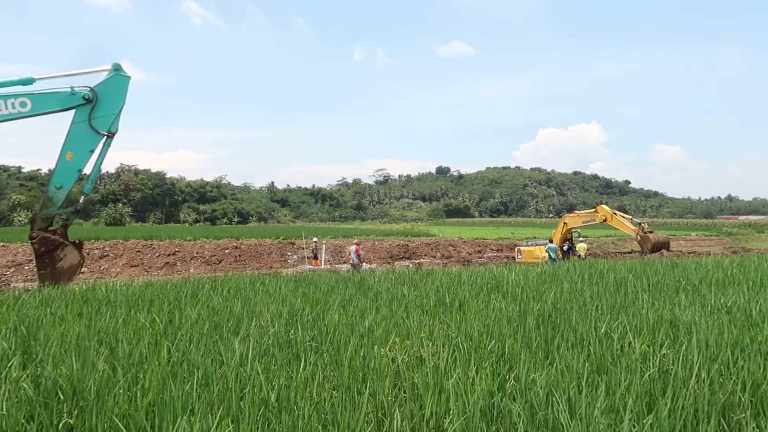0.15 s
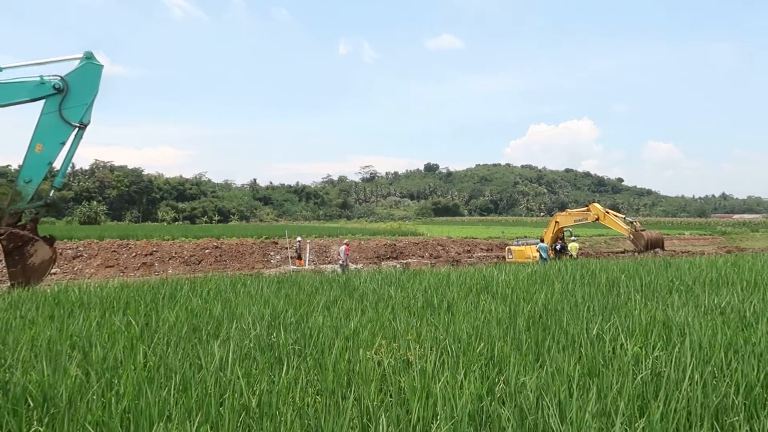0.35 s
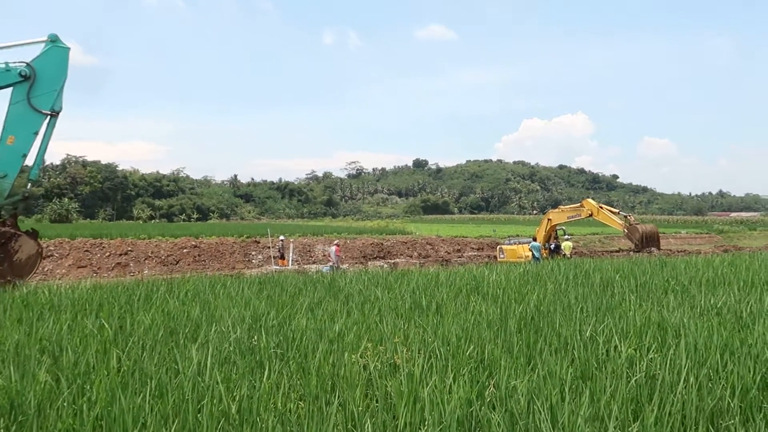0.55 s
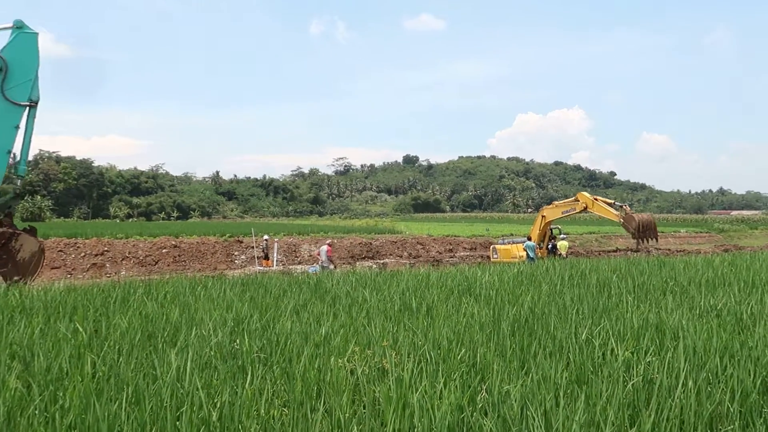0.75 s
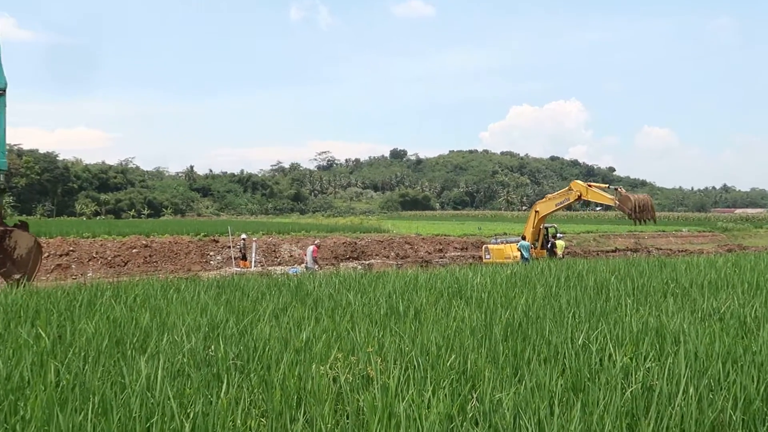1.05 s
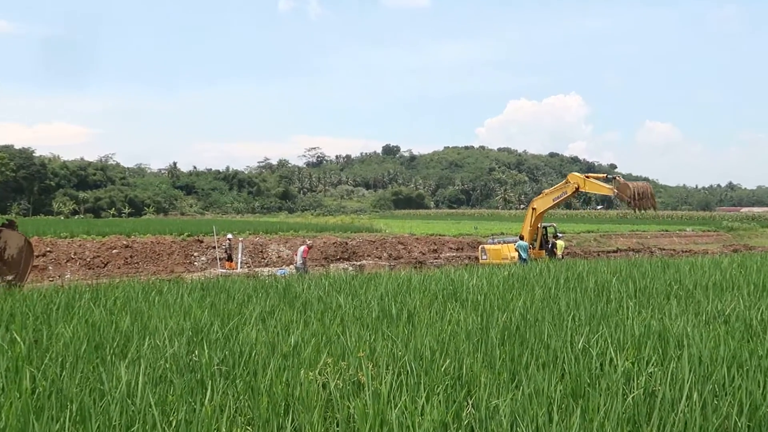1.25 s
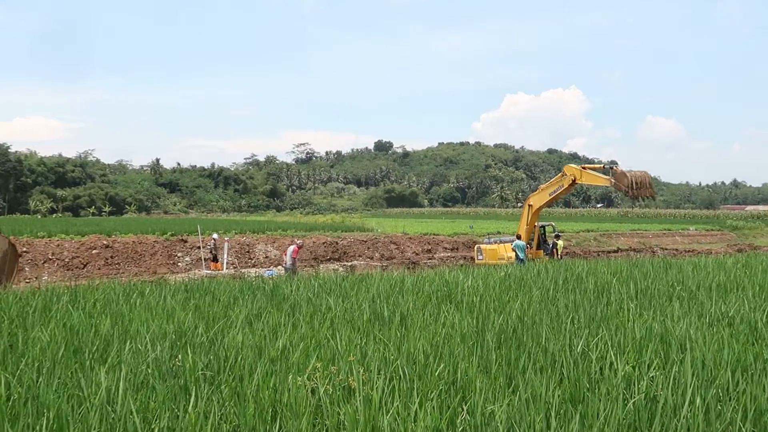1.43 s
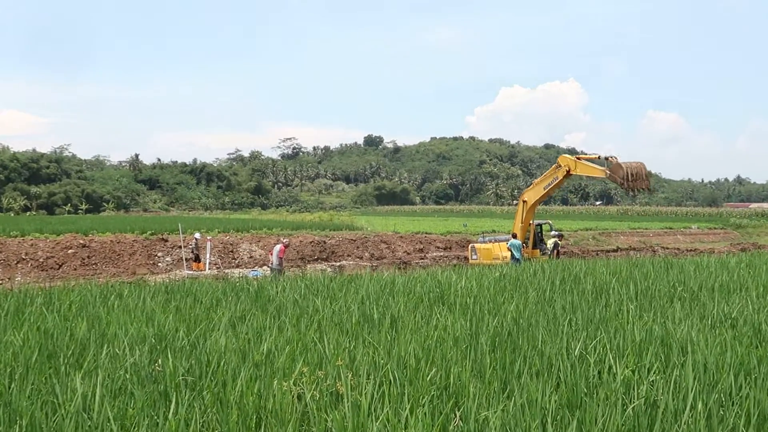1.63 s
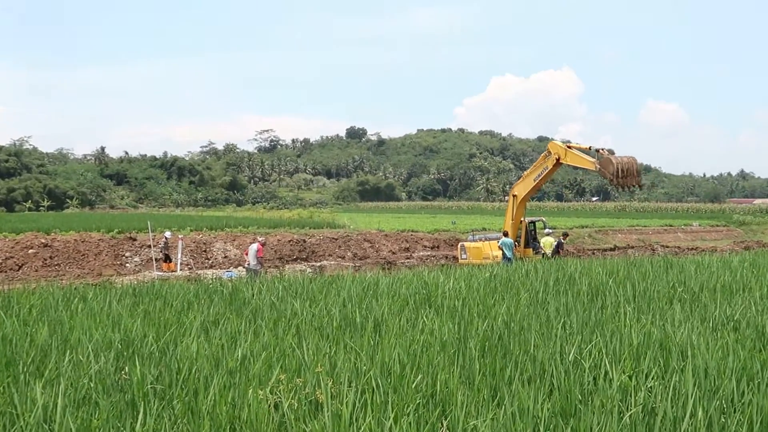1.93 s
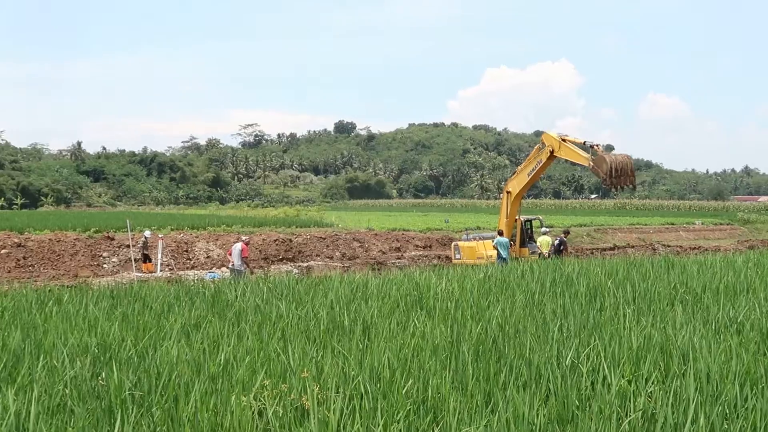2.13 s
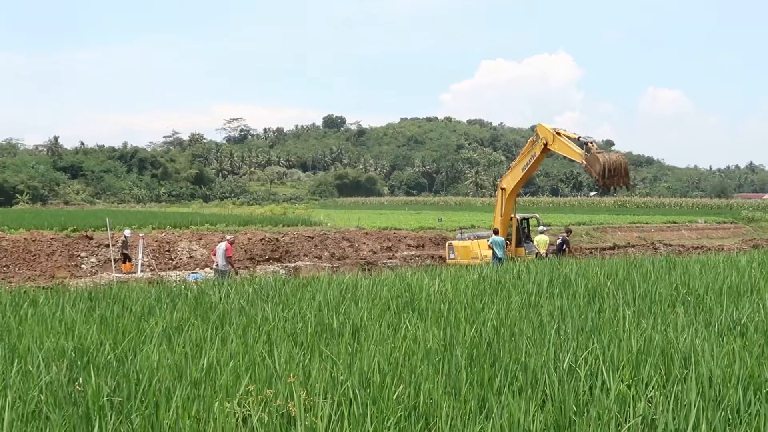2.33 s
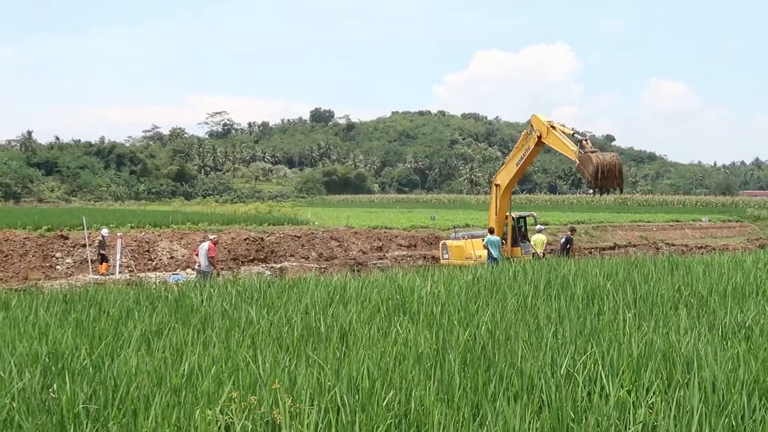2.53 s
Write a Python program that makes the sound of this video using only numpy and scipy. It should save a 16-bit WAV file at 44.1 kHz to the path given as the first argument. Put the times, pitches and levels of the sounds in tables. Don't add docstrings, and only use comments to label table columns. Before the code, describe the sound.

A steady, throbbing excavator engine drone carries over farmland, one engine revving up slightly then easing, with small dull soil knocks early on and wind rumbling and slapping at a close stereo microphone pair.

```python
import sys
import numpy as np
from scipy import signal
from scipy.fft import rfft, irfft
from scipy.io import wavfile
from scipy.ndimage import uniform_filter1d

SR = 44100
rng = np.random.default_rng(int(sys.argv[2]) if len(sys.argv) > 2 else 0)


def waveform_to_disk(signal):
    frames = np.transpose(np.atleast_2d(signal))
    scaled = np.clip(frames, -1, 1) * 32767
    samples = np.round(scaled).astype(np.int16)
    wavfile.write(sys.argv[1], SR, samples)


def linear_from_db(decibels):
    return 10 ** (np.asarray(decibels, float) / 20)


N = 118188
TIME_S = np.arange(N) / SR
BIN_HZ = np.arange(N // 2 + 1) * SR / N

PUMP_WANDER_DB, PUMP_SLIP_TURNS = 3, 0.22

# [t/s, clatter level/dB, hiss brightness/dB]
ENGINE_LOAD = [(0.0, -29, 0), (0.3, -28, 0.5), (0.44, -25, -3), (0.47, -25, -2), (0.52, -26.5, 0.5),
               (0.66, -26.5, 3), (0.85, -26, 0), (0.99, -29, 0.5), (1.01, -28, 2), (1.3, -25.5, -0.5),
               (1.6, -26.5, 0), (1.9, -25.5, 0), (2.15, -27.5, 1.5), (2.4, -27, -1), (2.68, -27.5, 0)]


def col(table, k):
    rows = np.array(table, float)
    return np.interp(TIME_S, rows[:, 0], rows[:, k])


def shape(table, k=1):
    rows = np.array(table, float)
    return np.interp(np.log(BIN_HZ + 1), np.log(rows[:, 0]), rows[:, k])


def unit(x):
    return x / np.sqrt(np.mean(x ** 2))


def walk(rate_hz):
    k = int(SR / rate_hz)
    held = np.repeat(rng.standard_normal(N // k + 2), k)
    return 1.193 * uniform_filter1d(uniform_filter1d(held, k), k)[:N]


def band(hz, width_hz):
    off = (BIN_HZ - hz) / (width_hz / 2)
    return unit(irfft(rfft(rng.standard_normal(N)) / (1 + 0.26 * off ** 2) ** 2, N))


def patchy(colour_db, lo_hz, hi_hz, flicker_db, rate_hz):
    spec = rfft(rng.standard_normal(N)) * linear_from_db(colour_db)
    octave = np.log2(BIN_HZ + 1)
    total = np.zeros(N)
    for mid_octave in np.arange(np.log2(lo_hz), np.log2(hi_hz), 1 / 3):
        window = np.clip(1 - 3 * abs(octave - mid_octave), 0, 1)
        total += irfft(spec * window, N) * linear_from_db(flicker_db * walk(rate_hz))
    return unit(total)


def partials(turns, orders, wander_db, slip_turns):
    total = np.zeros(N)
    for order, db in orders:
        level = np.sqrt(2) * linear_from_db(db + wander_db * walk(9.05))
        phase = order * turns + slip_turns * walk(6.1) + rng.random()
        total += level * np.sin(2 * np.pi * phase)
    return total


def port_air():
    # [f/Hz, density/dB per Hz]
    air = [(50, -21.5), (170, 2.5), (520, -1.5), (1500, -11), (2600, -3), (3400, -9), (5200, -13.5),
           (7000, -16)]
    return linear_from_db(-42.5) * patchy(shape(air), 40, 6500, 0.84, 6)


def crop_breeze():
    # [t/s, level/dB]
    breeze = [(0, 0.5), (.12, -1.5), (.33, -4.5), (.48, -2), (.56, 2), (.8, 0), (1.05, -4), (1.12, 1),
              (1.45, 0), (1.7, 1.5), (2.0, 4), (2.3, 0), (2.68, 0.5)]
    # [f/Hz, density/dB per Hz]
    treble = [(6000, -1), (7500, -0.5), (12300, 0.5), (13800, -9), (14600, -6.5), (15300, -22),
              (16500, -33)]
    level_db = -52 + col(breeze, 1) + 0.6 * walk(9)
    return linear_from_db(level_db) * patchy(shape(treble), 7100, 17000, 1.2, 5)


def wind_rumble():
    # [t/s, level/dB]
    gust = [(0.0, -18.5), (0.15, -19), (0.29, -21.5), (0.33, -22.5), (0.49, -14), (0.54, -18.5),
            (0.59, -18), (0.65, -16.5), (0.7, -18.5), (0.86, -18.5), (0.89, -22.5), (1.02, -13),
            (1.05, -20.5), (1.14, -18.5), (1.5, -19.5), (1.9, -18.5), (2.25, -17.5), (2.59, -17),
            (2.68, -26)]
    # [f/Hz, density/dB per Hz]
    colour = [(18, -38), (30, -22), (70, -4.5), (112, 2.5), (145, -2), (230, -3.5), (320, -5), (450, -13),
              (683, -25), (750, -31), (980, -58.5), (1650, -120)]
    return patchy(shape(colour), 25, 800, 2, 12.05) * linear_from_db(col(gust, 1) - 1.0)


def wind_slaps():
    # [t/s, pitch/Hz, length/cycles, peak level/dB]
    gust_slaps = [(.279, 127, 1.4, -7.5), (0.352, 163, 0.91, -15.5), (0.492, 183, 2, -20),
                  (.58, 100, 2, -18), (.603, 95, 1.2, -11), (.714, 122, 3.3, -8), (.76, 118, 5.8, -17),
                  (1.2, 100, 1.2, -14.5), (1.234, 123, 0.77, -8.5), (1.502, 107, 0.93, -10),
                  (1.698, 160, 3.6, -12.5), (1.99, 132, 2.6, -13), (2.334, 109, 2.9, -15.5),
                  (2.402, 109, 0.92, -19), (2.519, 93, 1.2, -12.5), (2.578, 111, 1.1, -11.5)]
    total = np.zeros(N)
    for start_s, hz, cycles, db in gust_slaps:
        turns = hz * (TIME_S - start_s)
        swell = np.exp(-0.5 * (turns / (0.5 * cycles)) ** 2)
        total += linear_from_db(db) * swell * np.sin(2 * np.pi * (turns + rng.random()))
    return total


def soil():
    # [t/s, length/s, low level/dB, high level/dB]
    knocks = [(0.038, .15, -37.5, -33.5), (.56, 0.093, -31.5, -38), (0.856, 0.09, -32.5, -40),
              (1.37, .08, -32.5, -40), (1.898, .15, -31, -39.5), (0.27, 0.052, -27.5, -43),
              (0.321, 0.035, -26.5, -24.5), (.385, 0.049, -26, -38), (0.458, 0.035, -28, -26),
              (0.492, 0.033, -21, -26), (0.708, 0.049, -25.5, -28), (1.017, 0.04, -33, -33),
              (2.042, 0.043, -39, -31.5)]
    low, high = band(400, 300), band(946, 600)
    total = np.zeros(N)
    for mid_s, length_s, low_db, high_db in knocks:
        swell = np.exp(-0.5 * ((TIME_S - mid_s) / (0.42 * length_s)) ** 2)
        total += swell * (linear_from_db(low_db) * low + linear_from_db(high_db) * high)
    return total


def turbo():
    # [t/s, f/Hz]
    whistle_hz = [(0, 12350), (.2, 12000), (.4, 11700), (.6, 11500), (.9, 11650), (1.1, 11250),
                  (1.7, 10700), (2.68, 10750)]
    # [t/s, level/dB]
    whistle_db = [(0, -55), (.2, -57), (.4, -59), (.6, -62), (.9, -58), (1.3, -63), (1.9, -58), (2.68, -61)]
    scatter = 0.004
    turns = np.cumsum(col(whistle_hz, 1) * (1 + scatter * walk(400))) / SR
    return linear_from_db(col(whistle_db, 1) + 3.0 * walk(30)) * np.sin(2 * np.pi * turns)


def fan_rush():
    # [f/Hz, density/dB per Hz]
    rush = [(420, -42.5), (650, -8.5), (795, -7.5), (960, 1), (1200, -1), (1490, -3.5), (1800, -9),
            (2200, -6.5)]
    # [f/Hz, density/dB per Hz]
    hiss = [(2000, 0.5), (2900, -5), (3300, -14), (5300, -19), (5900, -28), (7900, -31), (8600, -39),
            (11000, -43)]
    low = patchy(shape(rush), 538, 2000, 1, 8.04) * linear_from_db(-3.5)
    high = patchy(shape(hiss), 2154, 11500, 1.0, 7.2) * linear_from_db(-7 + col(ENGINE_LOAD, 2))
    return linear_from_db(col(ENGINE_LOAD, 1)) * (low + high)


def casing_clatter():
    # [f/Hz, width/Hz, level/dB]
    panels = [(339, 93, -37), (686, 26, -43.5), (880, 66, -40), (995, 100, -36.5), (1187, 150, -37),
              (1632, 89, -40.5), (1774, 47, -38.5), (1923, 47, -41), (2151, 93, -41.5), (2463, 80, -42),
              (2732, 47, -44.5)]
    wander_db = 1.5
    ringing = sum(linear_from_db(db + wander_db * walk(5.07)) * band(hz, width_hz) for hz, width_hz, db in panels)
    return ringing * linear_from_db(col(ENGINE_LOAD, 1) + 25.5)


def six_cylinder():
    # [t/s, firing rate/Hz, note level/dB, pump level/dB]
    engine = [(0, 92.1, -22, -63), (.4, 92.7, -24, -51), (.6, 96.15, -22.5, -58), (.9, 99.57, -21.5, -49),
              (1.55, 99.5, -23.5, -47), (1.7, 100, -26, -38), (1.9, 100.6, -28, -35),
              (2.1, 99.8, -25, -32.5), (2.2, 99, -23, -34), (2.3, 97.75, -21, -40),
              (2.68, 95.93, -25.5, -47)]
    # [multiple of firing rate, level/dB]
    exhaust_orders = [(1, -1.5), (1.5, -11.5), (2, -14), (3, -16)]
    pump_blades = 6
    turns = np.cumsum(col(engine, 1) * (1 + 0.0035 * walk(5))) / SR
    exhaust = linear_from_db(col(engine, 2)) * partials(turns, exhaust_orders, 1.5, 0.13)
    whine = partials(turns, [(pump_blades, 0)], PUMP_WANDER_DB / 2, PUMP_SLIP_TURNS / 2)
    return exhaust + linear_from_db(col(engine, 3)) * whine


def four_crank():
    # [t/s, firing rate/Hz]
    firing_hz = [(0, 62.5), (.95, 62.5), (1.12, 63.9), (2.68, 64.1)]
    return np.cumsum(col(firing_hz, 1) * (1 + 0.0011 * walk(4.94))) / SR


def four_cylinder(turns):
    # [t/s, note level/dB, pump first/dB, pump second/dB, pump third/dB]
    engine = [(0, -28, -36, -42, -52), (.22, -23, -37, -51, -45), (.32, -25, -52, -46, -48),
              (.55, -26, -52, -43, -45), (.66, -23, -38, -44, -37.5), (.8, -23, -40, -35.5, -36),
              (.95, -25, -39, -43, -50), (1.15, -23, -54, -40.5, -58), (1.5, -24.5, -50, -39.5, -49),
              (2.0, -24, -60, -38, -42), (2.2, -23, -60, -42, -50), (2.45, -23, -42, -44, -55),
              (2.68, -24, -45, -42, -46)]
    # [multiple of firing rate, level/dB]
    exhaust_orders = [(1, 0), (2, -6), (4, -8), (4.5, -12.5), (5, -9)]
    # [t/s, level/dB]
    silencer_boom = [(0, -39.5), (.15, -26), (.3, -25.5), (.38, -34.5), (.5, -16), (.6, -39), (.72, -23.5),
                     (.88, -24.5), (1.02, -27), (1.12, -29.5), (1.25, -29), (1.4, -30), (1.58, -22.5),
                     (1.7, -32.5), (1.92, -25), (2.1, -32), (2.3, -28), (2.45, -28.5), (2.68, -31)]
    pump_pistons = 9
    exhaust = linear_from_db(col(engine, 1)) * partials(turns, exhaust_orders, 2.34, 0.1)
    boom = linear_from_db(col(silencer_boom, 1)) * partials(turns, [(3, 0)], 1.3, 0.13)
    pump = np.zeros(N)
    for k in (1, 2, 3):
        whine = partials(turns, [(pump_pistons * k, 0)], PUMP_WANDER_DB, PUMP_SLIP_TURNS)
        pump += linear_from_db(col(engine, 1 + k)) * whine
    return exhaust + pump + boom


def port_difference(mid):
    # [f/Hz, level/dB, phase lead/rad]
    ports = [(60, -44, 1.5), (170, -30, 1.5), (520, -22.5, .95), (860, -15.5, .2), (1550, -9, .47),
             (2600, -5.5, .97), (3400, -2, 1.1), (7000, 1.5, 1.32)]
    return irfft(rfft(mid) * linear_from_db(shape(ports)) * np.exp(1j * shape(ports, k=2)), N)


def scene():
    turns = four_crank()
    throb = 1 + 0.078 * np.sin(2 * np.pi * turns)
    clatter = throb * (fan_rush() + casing_clatter())
    mid = wind_rumble() + wind_slaps() + soil() + clatter + six_cylinder() + four_cylinder(turns)
    side = port_difference(mid) + port_air() + crop_breeze() + turbo()
    stop_s = 0.003
    fade = np.sin(np.pi / 2 * np.clip((N - np.arange(N)) / (stop_s * SR), 0, 1))
    return np.array([mid + side, mid - side]) * fade


def band_limit(x):
    return signal.sosfilt(signal.butter(12, 15600, fs=SR, output="sos"), x)


def record(dry):
    knee, headroom = 0.5, 0.25
    over = np.maximum(abs(dry) - knee, 0)
    rounded = dry - np.sign(dry) * (over - headroom * np.tanh(over / headroom))
    return band_limit(rounded)


dry = scene()
out = record(dry)
waveform_to_disk(out)
```